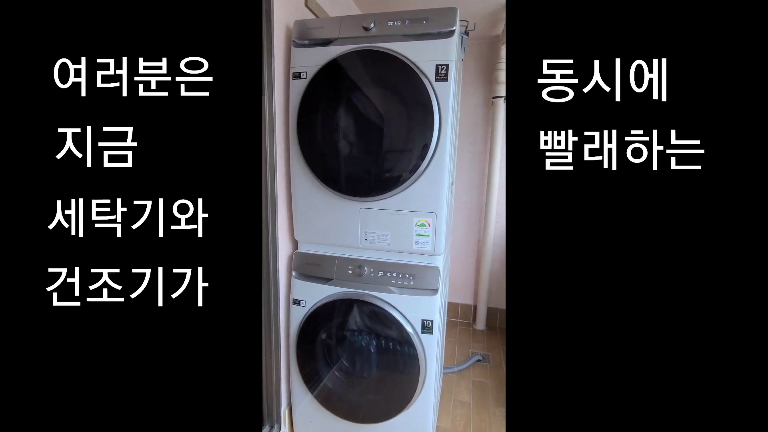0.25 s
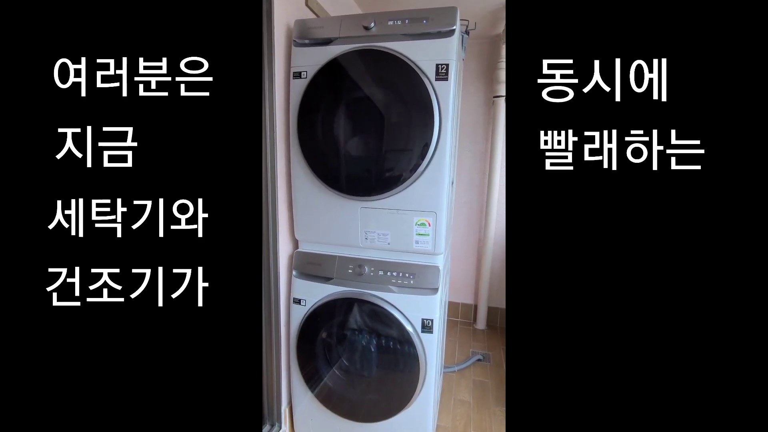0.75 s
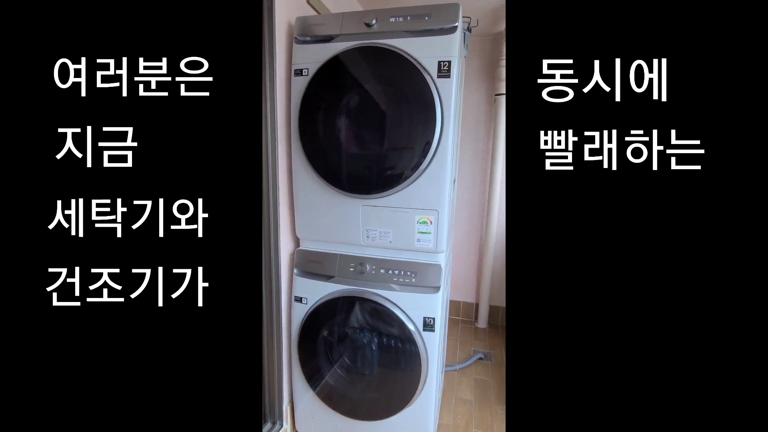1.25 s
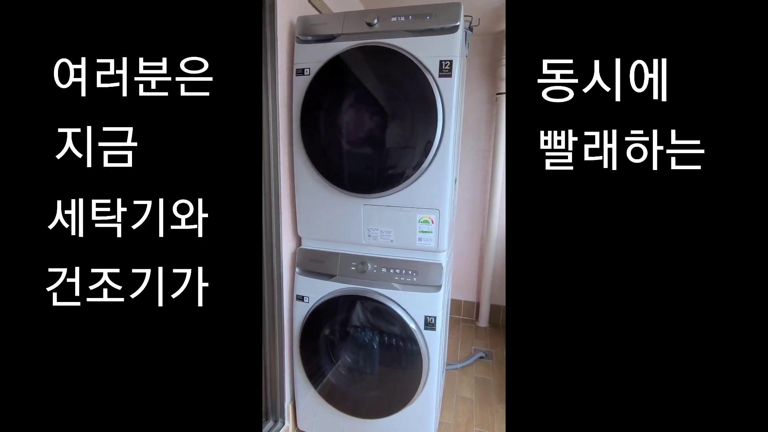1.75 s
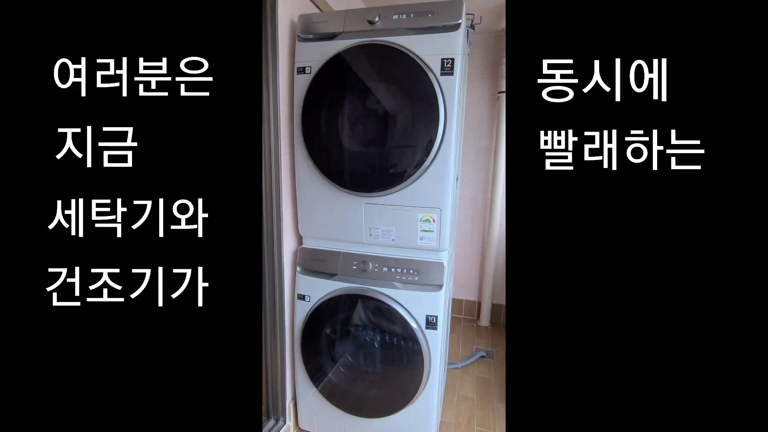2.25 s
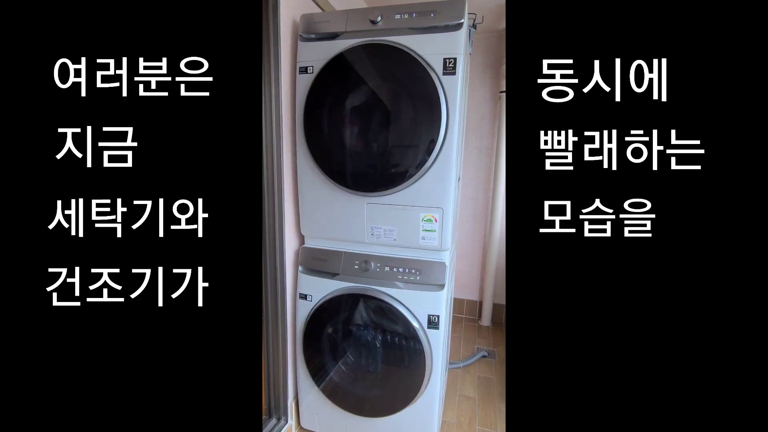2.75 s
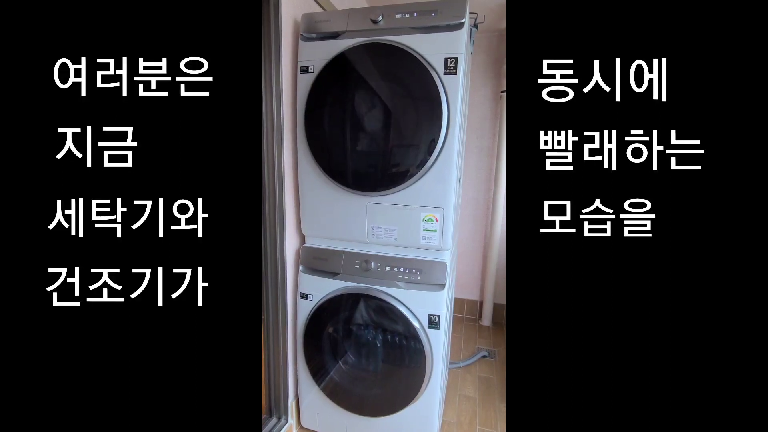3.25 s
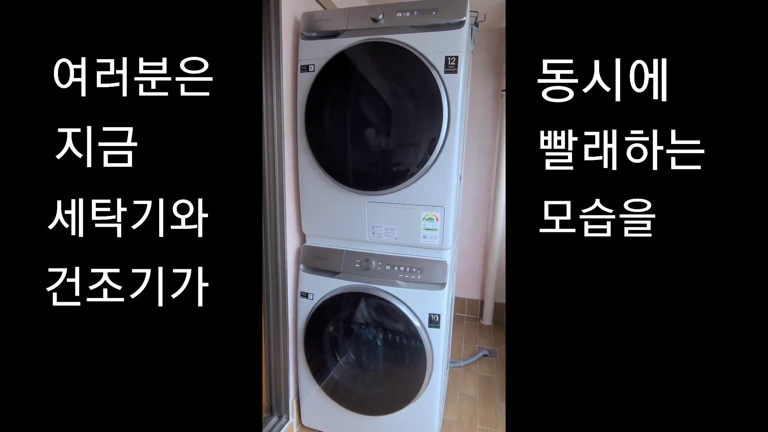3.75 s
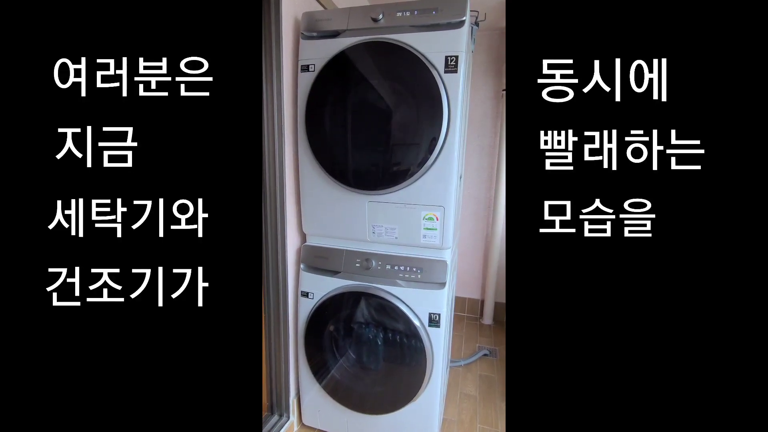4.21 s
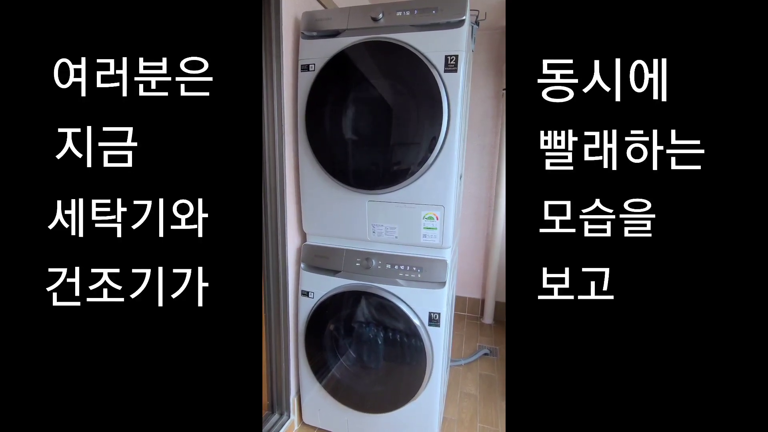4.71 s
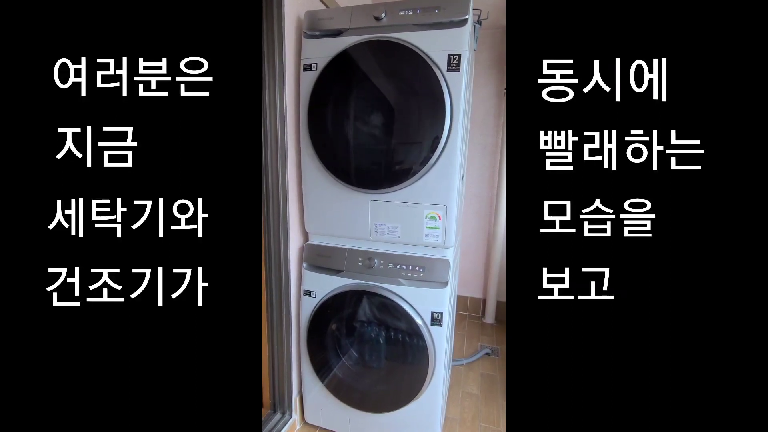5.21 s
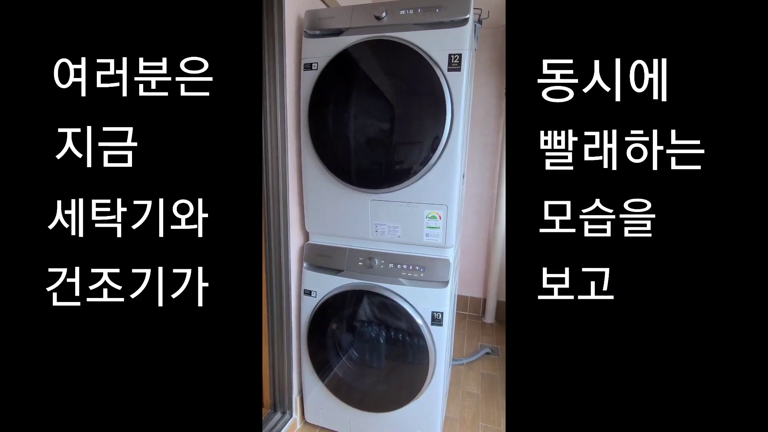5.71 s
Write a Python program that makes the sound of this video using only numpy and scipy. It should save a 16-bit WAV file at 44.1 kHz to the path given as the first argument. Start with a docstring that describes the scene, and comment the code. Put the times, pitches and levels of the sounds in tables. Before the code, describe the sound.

A washing machine and dryer are already running in a small tiled room and continue without stopping for six seconds. Low steady motor hum and a deep boom around 70 hertz surge and sag, with muffled rumble and gentle slosh. A thin whine near 765 hertz wobbles quickly and swells unevenly, over faint rushing air and a very quiet, high pulsing hiss. Wet laundry thuds softly at 0.5 seconds and most heavily at 0.9, with a splash and hollow double knock. Smaller thumps and knocks follow around 1.4, 1.8, 2.2 to 2.4, 2.8 and 3.3 to 3.4. Faint bright ticks scatter from about 0.6 to 3.2, clearer near 1.9 and 2.9. From 3.5 to 4.7 mostly drone and whine remain. Dull low thuds and light ticks return around 4.8 to 5.2, then a weak knock at 5.3. Reflections are short; stereo perspective stays fixed and fairly close.

```python
"""A washing machine with a dryer stacked on it, both running in a small tiled utility room.
Motors hum as steady sine tones; the cabinets rumble and the load sloshes as shaped noise.
A blower whines in swells as a wavering sine, and a compressor hisses as pulsing, narrow noise.
Wet laundry thuds, splashes and knocks on the washer door: short, fading tones and noise bursts.
Zips and buttons tick against the dryer drum as brief bright noise, and the tiles add reflections."""
import sys
import numpy as np
from scipy import signal
from scipy.io import wavfile

SR = 44100
rng = np.random.default_rng(int(sys.argv[2]) if len(sys.argv) > 2 else 0)


def generate_wav(sig):
    """Save sig (samples, or channels by samples) to the path in sys.argv[1] as 16-bit PCM at SR."""
    pcm = np.round(np.clip(np.atleast_2d(sig).T, -1, 1) * 32767).astype(np.int16)
    wavfile.write(sys.argv[1], SR, pcm)


N = 263277
TIME = np.arange(N) / SR
BURST_TIME = TIME[:SR // 2]   # every short sound is built on half a second

# Relative levels are shifted later, by the settings or by the left-right balance.
# "Fade" is the time a sound takes to drop by 60 dB.

# motor hum: (multiple of the turning rate, relative level [dB])
MOTOR_HUM = [(4, -43.5), (6, -50), (7, -52), (8, -59), (10, -62)]
# lowest cabinet resonance, over time: (time [s], relative level [dB])
BOOM_LEVEL = [(0.0, -39.5), (0.24, -46.5), (1.08, -42), (1.25, -61), (2.28, -39), (2.56, -47), (2.96, -37),
              (3.2, -52), (3.44, -35), (3.6, -61), (3.96, -40.5), (4.25, -46.5), (4.56, -39), (4.82, -41),
              (4.98, -51), (5.6, -39), (5.94, -47)]
# tumbling load, over time: (time [s], relative rumble level [dB], relative slosh level [dB])
TUMBLING_LOAD = [(0.0, -40.5, -65), (0.37, -41, -63.5), (0.71, -42.5, -63), (1.08, -41, -63),
                 (1.83, -42, -62.5), (5.85, -43.5, -65), (5.97, -41.5, -63)]
# colours of the three noises: (frequency [Hz], relative level per hertz [dB])
RUMBLE_COLOUR = [(20, -2), (40, -4), (60, -2), (100, 2), (125, 2), (180, -3), (230, -4), (300, -1.5),
                 (380, -8.5), (500, -4.5), (660, -19), (850, -3.5), (1100, -79)]
SLOSH_COLOUR = [(400, -18), (800, -8.5), (1100, -2.2), (1500, 2), (1900, -14), (3000, -8.5), (6000, -19.5)]
AIR_COLOUR = [(600, 4.5), (1800, 2), (2300, 5.5), (3200, -8.5), (3800, 3.5), (5000, -24), (6000, -7.5),
              (8300, -9.5), (9500, -9.5), (12500, -13), (14500, -8), (16000, -15)]
# likeness of left and right in these noises: (frequency [Hz], likeness [-1 to 1])
LEFT_RIGHT_LIKENESS = [(30, 0.73), (120, 0.95), (300, 0.89), (500, 0.73), (750, 0.13), (1100, -0.49),
                       (1500, -0.33), (2200, 0.25), (3000, -0.039), (16000, -0.041)]
# blower whine, over time: (time [s], middle pitch [Hz], relative level [dB])
BLOWER_WHINE = [(0.0, 769, -50), (.26, 760, -49.5), (.37, 765, -53.5), (.5, 762, -44), (.79, 757, -54),
                (1.04, 765, -47), (1.34, 769, -54), (1.47, 759, -49), (1.57, 760, -53), (1.7, 765, -45.5),
                (1.99, 758, -51.5), (2.22, 769, -47), (2.47, 764, -45.5), (2.6, 763, -55), (2.76, 767, -46),
                (2.85, 765, -50), (3.02, 762, -45.5), (3.15, 760, -52), (3.25, 755, -50), (3.54, 767, -47),
                (3.81, 766, -55), (3.99, 756, -49), (4.14, 767, -51), (4.38, 761, -50.5), (4.52, 763, -48),
                (4.94, 767, -52), (5.1, 764, -48), (5.43, 770, -51.5), (5.64, 757, -46), (5.97, 766, -52)]
# compressor hiss resonances: (frequency [Hz], width of each filter pass [Hz], relative level [dB])
HISS_RESONANCES = [(4215, 180, 0.5), (4453, 116, -1.5), (4637, 280, 2.5), (5124, 250, -5.5)]
# hollow knocks on the door: (time [s], level [dB], pitch [multiple of the door modes],
# rebound delay [s], rebound level against the knock [dB])
DOOR_KNOCKS = [(.015, -46, .97, 0.017, -9), (0.241, -48, .95, .016, -7), (0.91, -38.5, .94, .011, 1.5),
               (0.941, -45.5, .95, 0.012, -3), (1.403, -46.5, 1.08, 0.012, -3),
               (1.498, -45.5, 1.0, .016, -3), (1.823, -42, 1.03, .014, 1), (2.404, -40.5, 1.01, 0.022, -7),
               (3.275, -47.5, 1.0, 0.011, 1), (5.335, -48, 1.0, 0.015, -2)]
# ways the door rings: (frequency [Hz], relative level [dB], fade [s])
DOOR_MODES = [(1060, 6, 0.026), (1210, 9, 0.025), (1298, 10, 0.029), (1408, 11, 0.022), (1532, 5.5, 0.032),
              (1603, 0, 0.023), (2150, -14, 0.011)]
# wet laundry lands on the drum: (time [s], thud level before the drum modes [dB], thud pitch [Hz],
# thud fade before the drum modes [s], splash level [dB])
LAUNDRY_LANDINGS = [(.474, -19, 243, 0.1, -42.5), (.533, -26.5, 419, 0.067, -44),
                    (0.9174, -17.5, 223, 0.1, -41.5), (1.062, -29, 327, 0.08, -53.5),
                    (1.411, -28, 275, 0.1, -42), (2.177, -29.5, 197, 0.082, -46),
                    (2.335, -28, 221, 0.13, -53), (2.403, -37, 348, 0.06, -51),
                    (2.789, -33, 440, 0.053, -47), (3.28, -27.5, 321, 0.049, -50),
                    (3.389, -28.5, 126, 0.19, -67), (3.442, -26, 120, 0.05, -69),
                    (4.939, -25, 140, 0.07, -75), (5.183, -30.5, 121, 0.13, -69)]
# ways the drum rings: (multiple of the thud pitch, level against the thud [dB], share of the thud fade)
DRUM_MODES = [(0.8, -12, 0.74), (1.0, -3.5, 0.87), (1.55, -13.5, 0.65), (1.9, -19.5, 0.5), (2.8, -22, 0.67)]
# zips and buttons touch the drum: (time [s], relative level [dB], centre [Hz], width [share of centre])
FASTENER_TICKS = [(.786, -61, 7500, .5), (.846, -59, 7500, .5), (.96, -59, 7900, .4),
                  (1.19, -58.5, 7000, .7), (1.398, -56, 5000, .7), (1.758, -60, 8000, .5),
                  (1.792, -58.5, 8000, .4), (1.88, -51, 6500, 0.44), (1.921, -55, 7340, 0.5),
                  (2.024, -54, 4400, 0.64), (2.199, -58, 5500, 0.55), (2.574, -60, 6500, .45),
                  (2.777, -54.5, 7400, 0.53), (2.87, -52, 4280, 0.65), (2.994, -60, 8000, .35),
                  (3.248, -52.5, 6000, 0.25), (4.8, -53.5, 2480, 0.24), (5.178, -54.5, 3900, 1.3)]

MOTOR_TURNS_HZ = 11.318
WHINE_HZ = 768.5   # centre of the noise around the whine
WOBBLES_PER_S, WOBBLE_DEPTH_HZ = 6.63, 3.8   # regular pitch wobble of the blower
COMPRESSOR_STROKES_HZ = 117.2
SPLASH_HZ, SPLASH_LEAD_S = 563, .006   # the water is hit just before the drum
SMALL_SPLASHES_PER_S, SMALL_SPLASH_DB, SMALL_SPLASH_HZ = 2.6, -61, 750
FAINT_TICKS_PER_S, FAINT_TICK_DB, FAINT_TICK_HZ = 11, -70, 7800
TICK_TOP_HZ = 14400
ROOM_FADE_S = .17
CUTOFF_HZ = 15800


def from_db(db):
    """Turn decibels into a gain."""
    return 10 ** (np.asarray(db) / 20)


def rms_one(x):
    """Scale a sound to an average power of 1."""
    return x / np.sqrt(np.mean(x ** 2) + 1e-20)


def in_time(rows):
    """Join the points of each table column with straight lines, sample by sample."""
    seconds, *columns = np.transpose(rows)
    return [np.interp(TIME, seconds, column) for column in columns]


def at_hz(points, hz):
    """Read a value between table points, on a log-frequency axis."""
    freqs, values = np.transpose(points)
    return np.interp(np.log(hz), np.log(freqs), values)


def band(x, low_hz, high_hz, order=2):
    """Keep the part of a sound between two frequencies."""
    edges = [low_hz, min(high_hz, .45 * SR)]
    return signal.sosfilt(signal.butter(order, edges, "band", fs=SR, output="sos"), x)


def drift(rate_hz):
    """Smooth random wandering around 0 with an rms of 1; a higher rate wanders faster."""
    step = 40   # computed once per 40 samples, then joined by straight lines
    r = np.exp(-2 * step * np.pi * rate_hz / SR)
    noise = rng.standard_normal(N // step + 2002)
    slow = signal.lfilter([1], [1, -2 * r, r * r], noise)[2000:]   # skip the filter's start
    return np.interp(np.arange(N) / step, np.arange(len(slow)), rms_one(slow))


def resonate(x, hz, width_hz):
    """Let a sound ring at one frequency, with a gain of about 1 at the peak."""
    r = np.exp(-np.pi * width_hz / SR)
    feed = np.array([1, 0, -1]) * (1 - r * r) / 2
    return signal.lfilter(feed, [1, -2 * r * np.cos(2 * np.pi * hz / SR), r * r], x)


def stereo(pair, alike):
    """Mix two unrelated signals into left and right of a given likeness."""
    alike = np.clip(alike, -1, 1)
    shared = np.sqrt(1 + alike) * pair[0]
    opposed = np.sqrt(1 - alike) * pair[1] * [[1], [-1]]
    return shared + opposed


def coloured_noise(colour, flicker_db, flicker_rate):
    """Stereo noise in third-octave bands that each flicker on their own; rms 1."""
    lowest, highest = np.log2(colour[0][0]), np.log2(colour[-1][0])
    edges = 2 ** np.arange(lowest, highest + 1 / 3, 1 / 3)
    white = rng.standard_normal((2, 2, N))   # neighbouring bands take turns with two noises
    out = 0
    for k, (low, high) in enumerate(zip(edges, edges[1:])):
        hz = np.sqrt(low * high)
        gain = from_db(at_hz(colour, hz) + flicker_db * drift(flicker_rate))
        out = out + gain * stereo(band(white[k % 2], low, high), at_hz(LEFT_RIGHT_LIKENESS, hz))
    return rms_one(out)


def blow(rise_s, fade_s):
    """Loudness shape of a contact: a smooth rise, then a decay; peak 1."""
    rise = 1 - np.exp(-(BURST_TIME / rise_s) ** 2)
    shape = rise * from_db(-60 * BURST_TIME / fade_s)
    return shape / shape.max()


def add(out, start_s, sound):
    """Mix a short sound in at a given time."""
    part = out[max(round(start_s * SR), 0):][:len(sound)]
    part += sound[:len(part)]


def in_room(x, wet_db, alike):
    """Add the dense reflections of close tiled walls, as fading noise, to the direct sound."""
    tail = stereo(rng.standard_normal((2, SR // 2)), alike) * blow(0.0043, ROOM_FADE_S)
    tail /= np.sqrt(np.sum(tail ** 2) / 2)
    return x + from_db(wet_db) * signal.fftconvolve(x[None], tail, axes=1)[:, :N]


def scattered(start_s, end_s, per_s, db, hz):
    """Loosely spaced small contacts of varying strength and colour: rows (time [s], level [dB], [Hz])."""
    slots = np.arange(start_s, end_s, 1 / per_s)
    when, strength, colour = rng.uniform(-1, 1, (64, 3))[:len(slots)].T
    times = slots + (when + 1) / 2 / per_s
    return list(zip(times, db + 2 * strength, hz * (1 + colour / 10)))


def motors(wander_hz, sway_db, lag_rad):
    """Steady low tones locked to the turning of one motor, the left side lagging slightly."""
    turns = np.cumsum(MOTOR_TURNS_HZ + wander_hz * drift(2.7)) / SR
    out = 0
    for multiple, db in MOTOR_HUM:
        phase = 2 * np.pi * (multiple * turns + rng.random())
        tone = np.sqrt(2) * np.sin(phase - np.array([[lag_rad], [0]]))
        out = out + from_db(db + sway_db * drift(3.8)) * tone
    return out


def cabinet_boom(hz, width_hz, motor_hz, wander_hz, motor_db):
    """The load shakes the lowest panel resonance (filtered noise), joined by the drum motor's drone."""
    shaking = stereo(rng.standard_normal((2, N)), 0.87)
    panel = rms_one(resonate(resonate(shaking, hz, width_hz), hz, width_hz))
    motor_pitch = motor_hz + wander_hz * drift(2.22)
    drone = np.sqrt(2) * np.sin(2 * np.pi * np.cumsum(motor_pitch) / SR)
    level_db, = in_time(BOOM_LEVEL)
    return from_db(level_db - 2.5) * rms_one(panel + from_db(motor_db) * drone)


def tumbling_load():
    """The tumbling load makes low rumble and brighter slosh, two noises that follow its levels."""
    rumble_db, slosh_db = in_time(TUMBLING_LOAD)
    rumble = from_db(rumble_db + 1.5) * coloured_noise(RUMBLE_COLOUR, flicker_db=2.0, flicker_rate=10.2)
    slosh = from_db(slosh_db + 4.5) * coloured_noise(SLOSH_COLOUR, flicker_db=2.5, flicker_rate=16.4)
    return rumble + slosh


def rushing_air():
    """Air rushes as bright noise whose level quivers slightly."""
    level_db = -62.5 + 0.62 * drift(17.0)
    return from_db(level_db) * coloured_noise(AIR_COLOUR, flicker_db=1.0, flicker_rate=22)


def blower(tone_db, jitter_hz, jitter_rate, flutter_db, flutter_rate, skirt_db, skirt_hz):
    """A blade tone swells and wobbles with the airflow; turbulence adds a quiver and noise around it."""
    pitch, level_db = in_time(BLOWER_WHINE)
    wobble = WOBBLE_DEPTH_HZ * np.cos(2 * np.pi * WOBBLES_PER_S * TIME)
    pitch = pitch + wobble + jitter_hz * drift(jitter_rate)
    level_db = level_db + tone_db + flutter_db * drift(flutter_rate)
    phase = 2 * np.pi * np.cumsum(pitch) / SR - np.array([[.65], [0]])   # left lags, in radians
    tone = from_db(level_db) * np.sqrt(2) * np.sin(phase)
    eddies = resonate(stereo(rng.standard_normal((2, N)), 0.055), WHINE_HZ, skirt_hz)
    skirt = rms_one(resonate(eddies, WHINE_HZ, skirt_hz))
    return tone + from_db(skirt_db) * skirt


def compressor(level_db, depth):
    """Gas hisses through narrow resonances, pulsing with each stroke."""
    strokes = 1 + depth * np.sin(2 * np.pi * COMPRESSOR_STROKES_HZ * TIME)
    hiss = 0
    for hz, width_hz, db in HISS_RESONANCES:
        gas = rng.standard_normal((2, N))
        hiss = hiss + from_db(db) * rms_one(resonate(resonate(gas, hz, width_hz), hz, width_hz))
    flicker = from_db(1.0 * drift(12))
    return from_db(level_db) * rms_one(hiss * strokes * flicker)


def knocks(wet_db, rise_s):
    """Each knock and its rebound ring the damped door modes, higher or lower with the spot that is hit."""
    out = np.zeros(N)
    touches = [row[:3] for row in DOOR_KNOCKS]
    for s, db, pitch, delay, rebound_db in DOOR_KNOCKS:
        touches.append((s + delay, db + rebound_db, pitch))
    # each touch excites the modes in its own random balance
    balances = from_db(rng.normal(0, 3.5, (len(touches), len(DOOR_MODES))))
    for (s, db, pitch), strengths in zip(touches, balances):
        knock = 0
        for strength, (hz, mode_db, fade_s) in zip(strengths, DOOR_MODES):
            ring = blow(rise_s, fade_s) * np.sin(2 * np.pi * pitch * hz * BURST_TIME)
            knock = knock + strength * from_db(mode_db) * ring
        add(out, s, from_db(db) * knock / np.abs(knock).max())
    return in_room(out, wet_db, alike=-0.67)


def splashes(width, rise_s, fade_s, muffle):
    """A short noise burst with each landing and small ones between, dulled by the door glass."""
    out = np.zeros(N)
    large = [(s - SPLASH_LEAD_S, db, SPLASH_HZ) for s, *_, db in LAUNDRY_LANDINGS]
    small = scattered(0, N / SR, SMALL_SPLASHES_PER_S, SMALL_SPLASH_DB, SMALL_SPLASH_HZ)
    for s, db, hz in large + small:
        splash = resonate(rng.standard_normal(SR // 2), hz, width * hz)
        splash = rms_one(band(splash, hz / 4, muffle * hz))
        add(out, s, from_db(db) * splash * blow(rise_s, fade_s))
    return in_room(out, wet_db=0.5, alike=0.094)


def thuds(rise_s):
    """A soft heavy landing rings the damped drum modes, which die away quickly."""
    out = np.zeros(N)
    for s, db, hz, fade_s, _ in LAUNDRY_LANDINGS:
        for multiple, mode_db, share in DRUM_MODES:
            ring = np.sin(2 * np.pi * multiple * hz * BURST_TIME)
            add(out, s, from_db(db + mode_db) * blow(rise_s, share * fade_s) * ring)
    return in_room(out, wet_db=-12, alike=.7)


def ticks(level_db, fade_s, faint_width, snap_db, snap_hz, snap_fade_s):
    """Small hard contacts, faint ones among them: a dry broad snap and a bright scuff with room sound."""
    scuffs, snaps = np.zeros(N), np.zeros((2, N))
    faint = scattered(0.55, 2.8, FAINT_TICKS_PER_S, FAINT_TICK_DB, FAINT_TICK_HZ)
    soften = signal.butter(2, TICK_TOP_HZ, fs=SR, output="sos")
    for s, db, hz, width in list(FASTENER_TICKS) + [(*row, faint_width) for row in faint]:
        scuff = resonate(rng.standard_normal(SR // 2), hz, width * hz)
        scuff = rms_one(signal.sosfilt(soften, scuff))
        add(scuffs, s, from_db(db + level_db) * scuff * blow(0.0027, fade_s))
        for channel in snaps:
            snap = rms_one(band(rng.standard_normal(SR // 2), snap_hz, CUTOFF_HZ))
            add(channel, s, from_db(db + snap_db) * snap * blow(0.0016, snap_fade_s))
    return snaps + in_room(scuffs, wet_db=2.0, alike=0)


def scene():
    """Mix both machines: hum and boom a little to the right; air, hiss and ticks a little to the left."""
    hum = motors(wander_hz=0.008, sway_db=1.36, lag_rad=0.26)
    boom = cabinet_boom(hz=74, width_hz=21, motor_hz=71.83, wander_hz=1.32, motor_db=1.0)
    load = tumbling_load()
    air = rushing_air()
    whine = blower(tone_db=1.14, jitter_hz=9.71, jitter_rate=38.1, flutter_db=0.26, flutter_rate=19,
                   skirt_db=-55.5, skirt_hz=117)
    hiss = compressor(level_db=-66.5, depth=0.3)
    laundry = knocks(wet_db=-0.5, rise_s=0.002)
    laundry = laundry + splashes(width=0.41, rise_s=0.0036, fade_s=0.1, muffle=4.1)
    laundry = laundry + thuds(rise_s=0.0021)
    fasteners = ticks(level_db=-6.0, fade_s=0.046, faint_width=0.36,
                      snap_db=-22, snap_hz=7000, snap_fade_s=0.04)
    low = (hum + boom) * from_db([[-1.1], [1.1]])   # left, right
    high = (air + hiss + fasteners) * from_db([[.7], [-.7]])
    return low + load + whine + laundry + high


def record(dry):
    """Cut the very highest sounds off steeply."""
    return signal.sosfilt(signal.ellip(12, .1, 90, CUTOFF_HZ, fs=SR, output="sos"), dry)


dry = scene()
out = record(dry)
generate_wav(out)
```